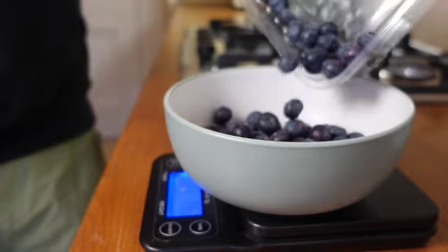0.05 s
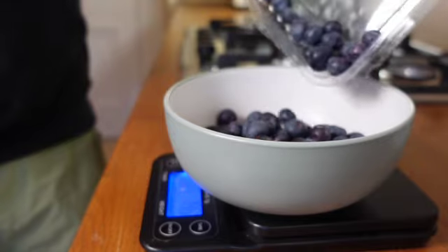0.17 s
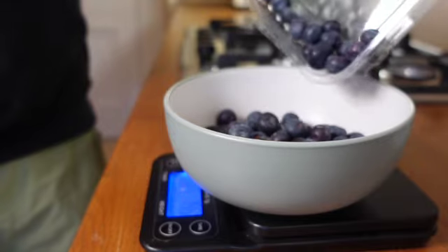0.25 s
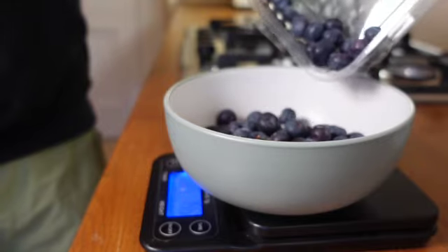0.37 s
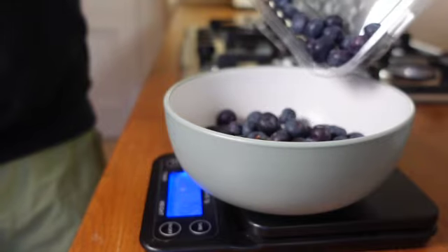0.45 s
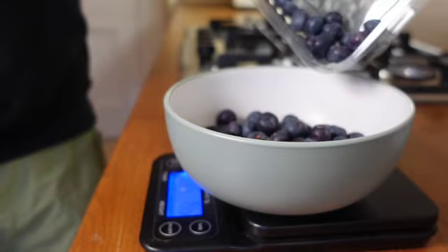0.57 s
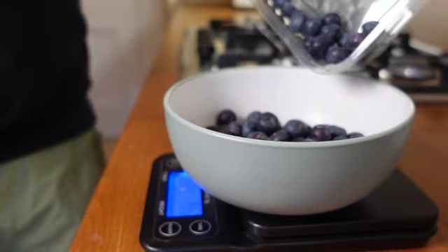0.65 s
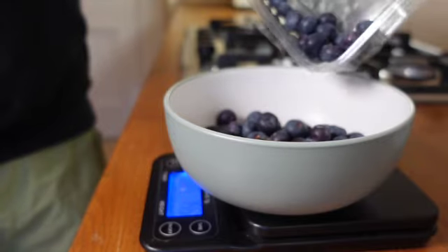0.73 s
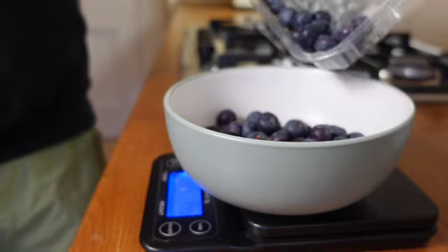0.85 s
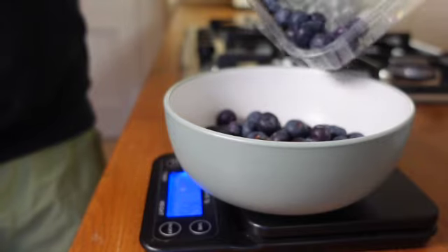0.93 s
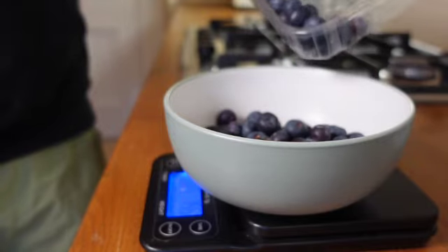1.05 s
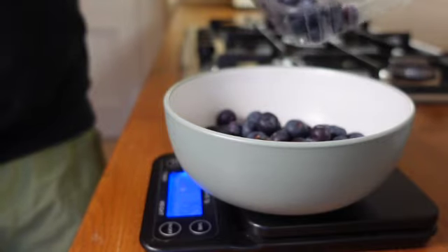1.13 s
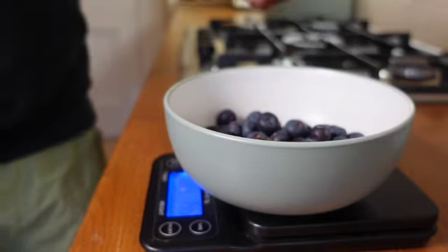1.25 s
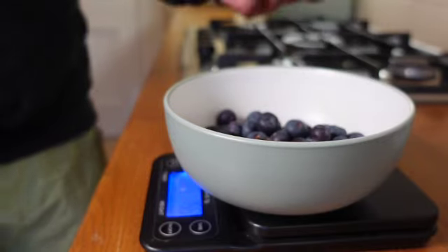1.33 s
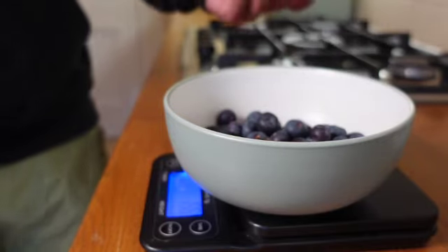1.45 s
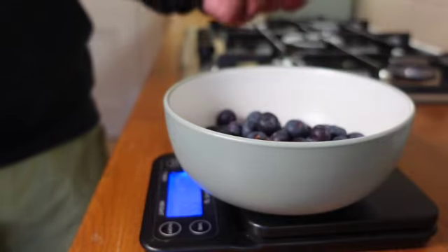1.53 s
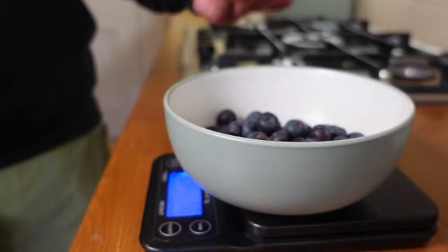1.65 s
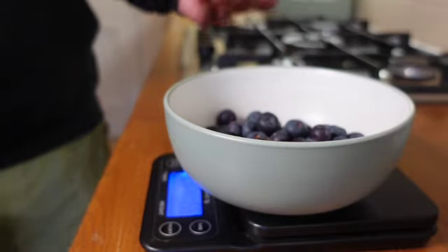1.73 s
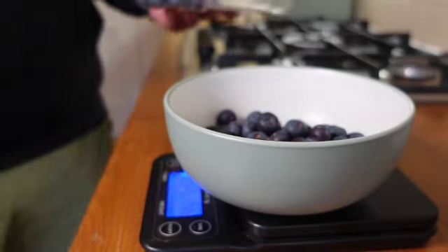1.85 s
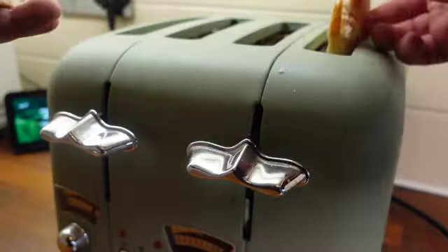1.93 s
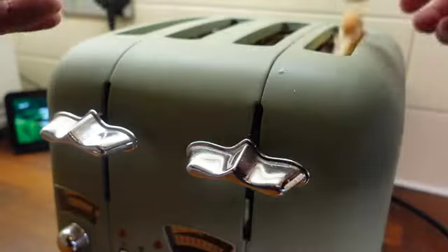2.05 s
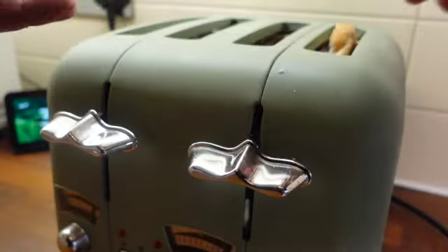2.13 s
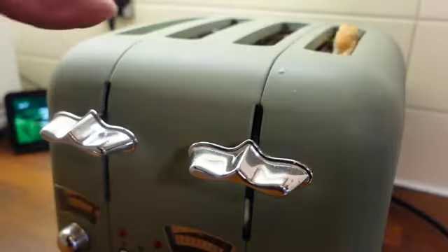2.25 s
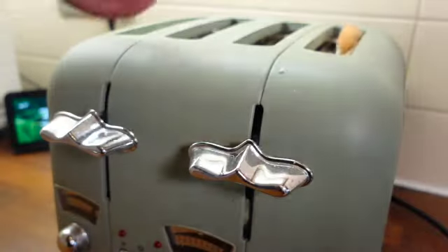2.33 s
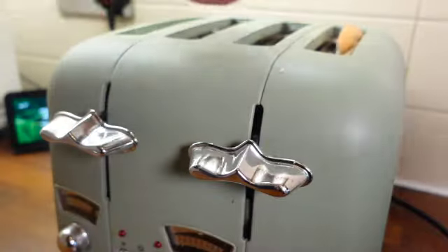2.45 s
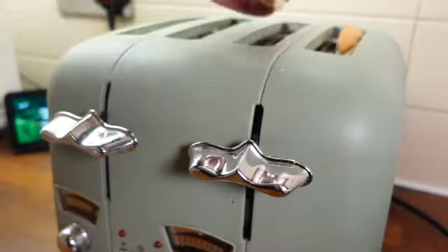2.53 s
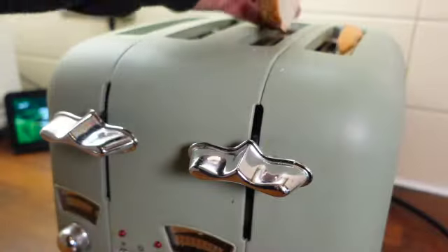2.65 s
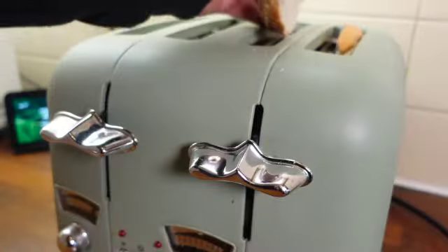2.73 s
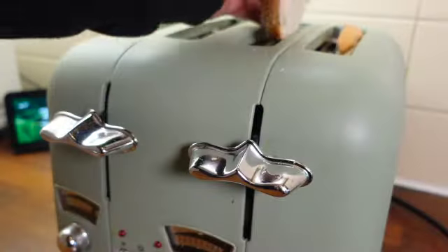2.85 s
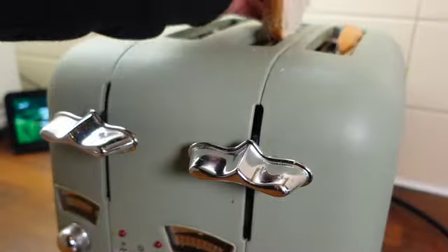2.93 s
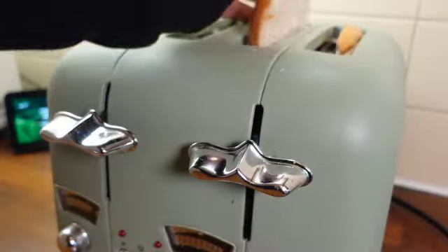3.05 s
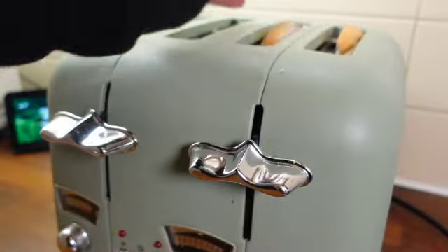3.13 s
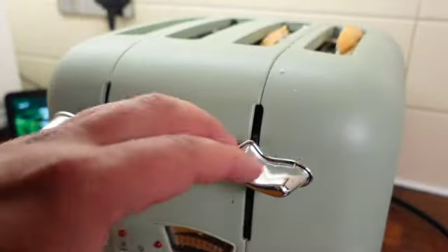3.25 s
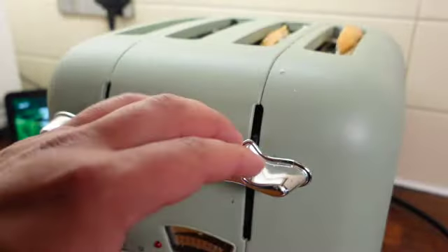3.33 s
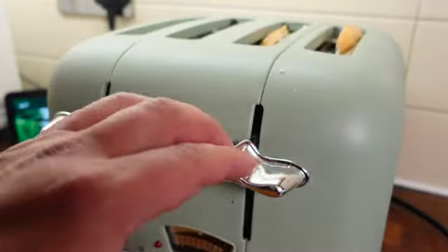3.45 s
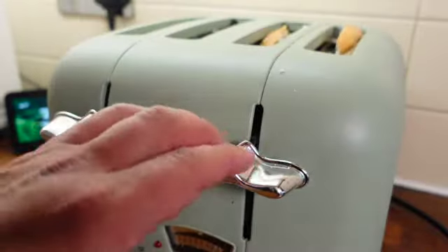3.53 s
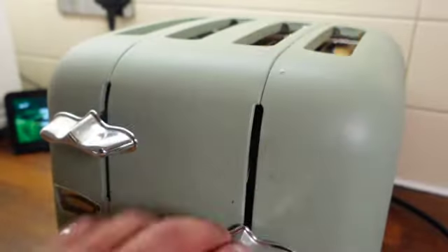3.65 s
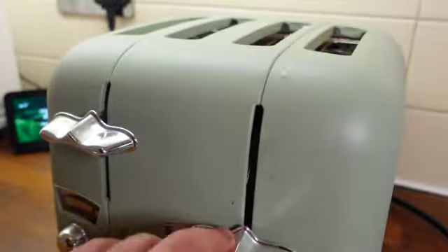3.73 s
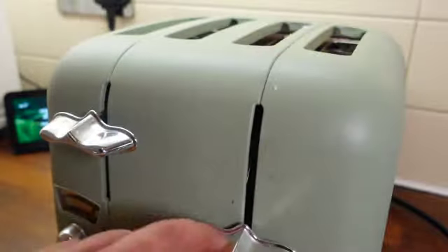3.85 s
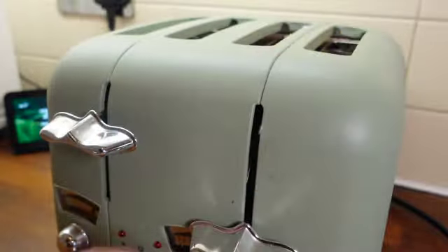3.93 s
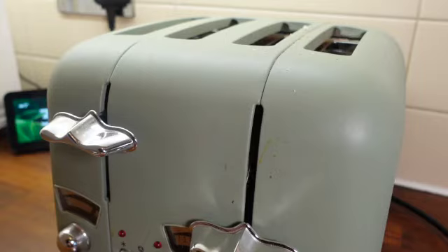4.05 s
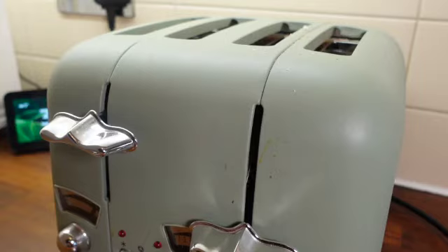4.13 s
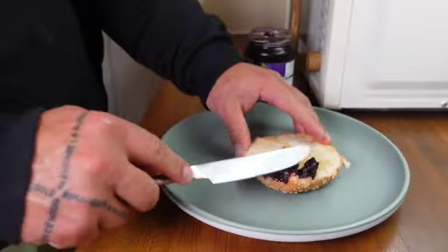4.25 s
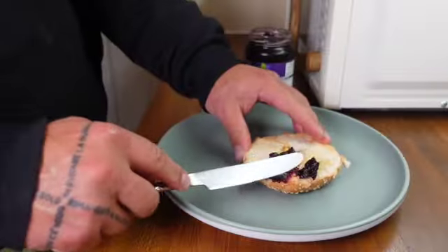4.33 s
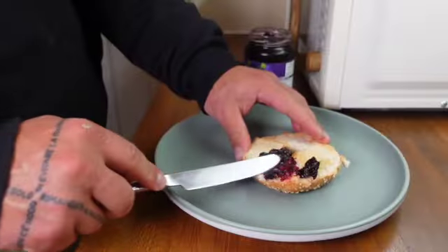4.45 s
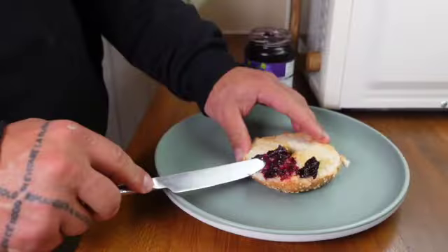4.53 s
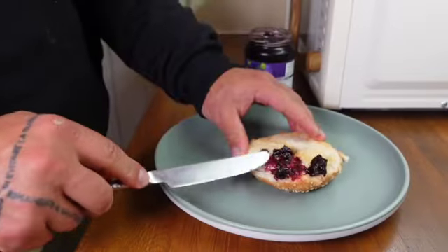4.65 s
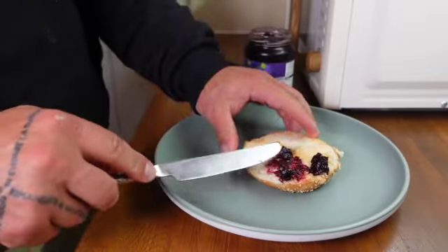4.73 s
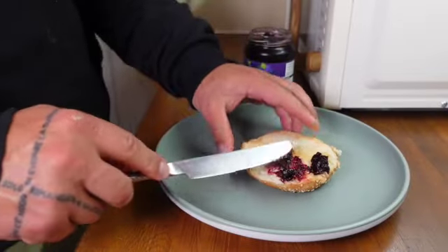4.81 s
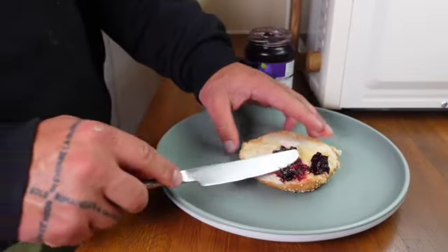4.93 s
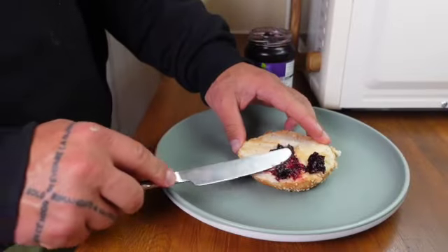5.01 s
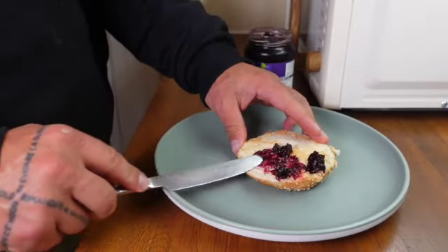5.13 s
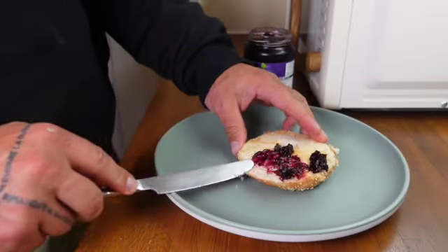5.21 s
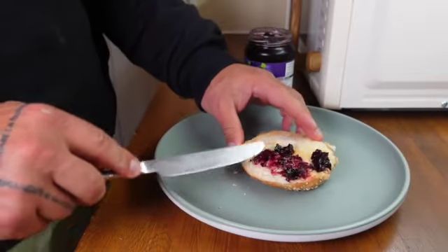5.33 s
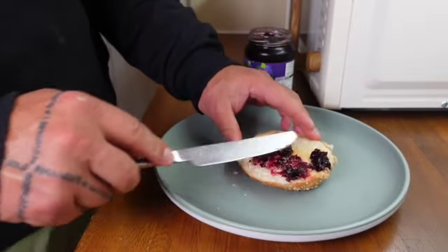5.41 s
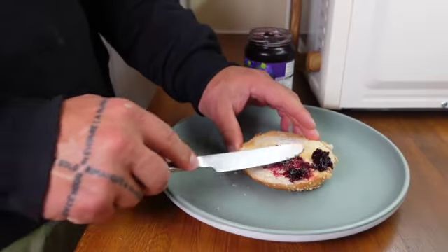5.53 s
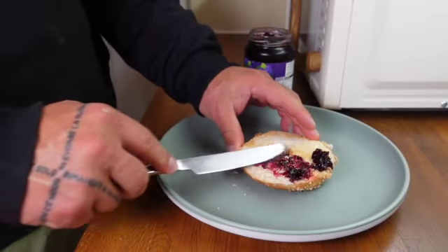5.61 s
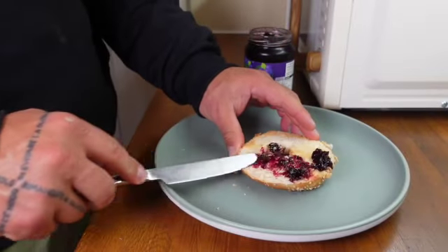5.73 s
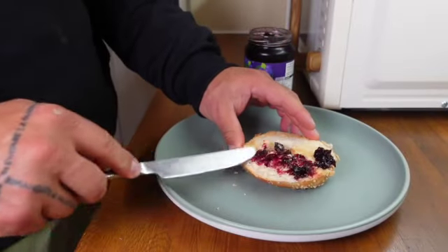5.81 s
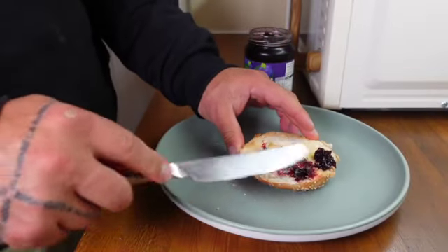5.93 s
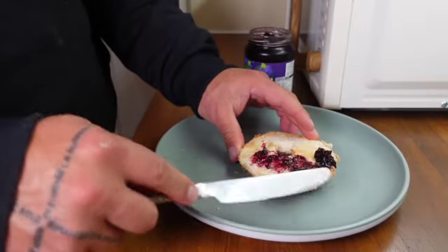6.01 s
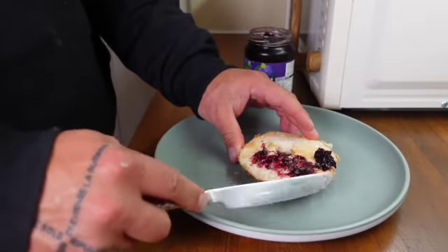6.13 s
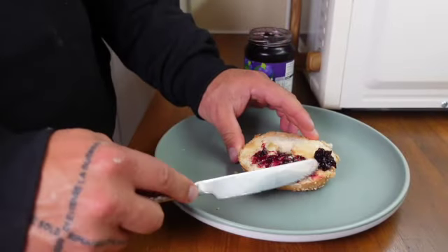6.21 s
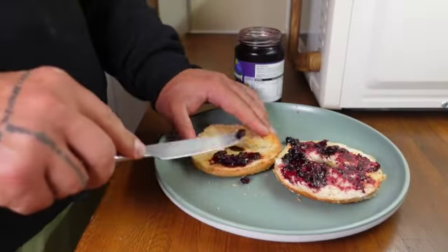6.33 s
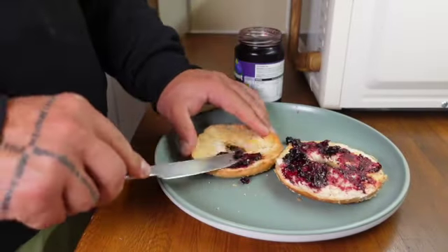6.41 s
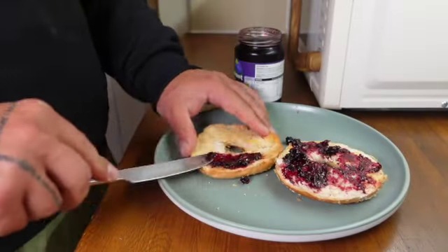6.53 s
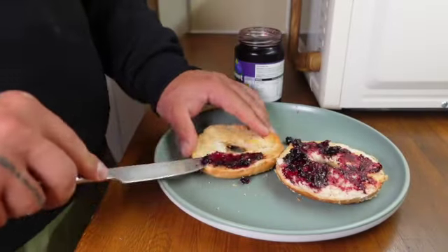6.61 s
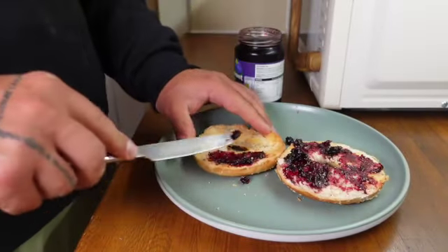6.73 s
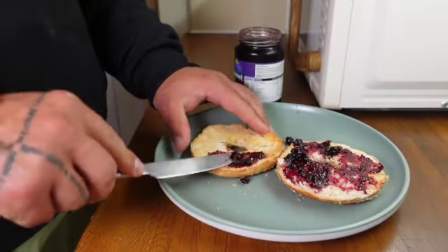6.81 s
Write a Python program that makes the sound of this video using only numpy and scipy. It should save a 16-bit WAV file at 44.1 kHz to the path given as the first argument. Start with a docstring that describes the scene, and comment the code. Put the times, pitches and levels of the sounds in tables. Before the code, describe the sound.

Close stereo recording of breakfast making indoors. It starts very quietly: tiny berry taps, a soft bowl tone, a plastic rustle and dull worktop knocks. Two bursts of dry, metallic scraping come next, the second ending in a loud sprung clatter that stops abruptly. Finally, gentle hissing knife strokes spread jam, mixed with short crunchy scrapes, snapping crumbs and a clear ringing clink of steel on china.

```python
"""Berries, bagel and jam

Three close moments in a small kitchen. Berries slide in a plastic punnet while a china bowl rings out, and
things are set aside. Two bagel halves scrape into a metal toaster and its carriage clatters down. A table
knife spreads jam over the toasted crust and clinks on the plate. Rubbing is noise full of tiny slips, blows
are short coloured cracks, and ringing is made of fading tones or narrow bands of noise."""
import sys
import numpy as np
from scipy import signal
from scipy.io import wavfile
from scipy.ndimage import uniform_filter1d

SR = 44100
rng = np.random.default_rng(int(sys.argv[2]) if len(sys.argv) > 2 else 0)


def master(y):
    """Save y as 16-bit WAV."""
    cut = np.clip(np.atleast_2d(y).T, -1, 1)
    pcm = np.round(cut * 32767)  # scale
    wavfile.write(sys.argv[1], SR, pcm.astype(np.int16))


N = 302815

# Levels of strokes and blows are relative: each layer adds its own level_db.
# Blows: (time [s], level [dB], hardness [dB per octave], pitch of the struck spot [Hz])
# the last berries drop and tick against the punnet
BERRY_TICKS = [(.011, -49, -2.5, 4500), (.038, -51.5, -4.5, 2000), (.059, -48.5, -3, 450),
               (.118, -59, 5, 13000), (.17, -65, 10, 14000)]
# things are set aside on the worktop
KNOCKS = [(1.054, -39.5, 0.5, 164), (1.1967, -51, 3, 2470), (1.4296, -39.5, 1, 1100),
          (1.491, -32.5, 1.5, 1030), (1.499, -33, -1, 337), (1.6168, -42, -2, 1630),
          (1.6488, -35.5, 1, 2260), (1.6567, -38, 0, 1480), (1.702, -31.5, 2.5, 1600),
          (1.7689, -38.5, 0, 1260), (1.816, -44, -1.5, 1580), (1.8622, -41.5, -1, 905)]
# hard crust bumps the toaster slots
SLOT_BUMPS = [(1.943, -33.5, -0.5, 5130), (1.9769, -35.5, 3, 5170), (2.0265, -22.5, -3, 1400),
              (2.035, -26.5, 2.5, 2760), (2.1356, -21.5, 6.5, 3040), (2.144, -15, -1, 3320),
              (2.159, -15, 1, 3290), (2.1945, -17.5, -3.5, 3070), (2.3476, -34.5, 2.5, 3380),
              (3.0061, -35.5, -2, 5810), (3.1347, -34.5, -9.5, 328), (3.169, -22.5, 6.5, 3390),
              (3.1966, -20, -2, 3870), (3.2131, -14.5, -1.5, 3330), (3.2321, -25.5, -6, 3360)]
# the metal carriage clanks; one more column: (..., ring of the shell relative to the level [dB])
CLANKS = [(3.2888, -11.5, -1.5, 3740, -21.5), (3.464, -34.5, -6.5, 3260, -13), (3.5938, -43, -3, 2870, -12),
          (3.6408, -14, 5, 2970, -23), (3.667, -15, 4, 4110, -59), (3.6882, -16.5, 7.5, 5630, -38),
          (3.6985, -10, -5.5, 2990, -21), (3.744, -23, 13.5, 5230, -48), (3.81, -20, -9, 3000, -37)]
# crumbs snap under the blade
CRUST_SNAPS = [(4.4159, -37.5, 1, 7900), (4.5935, -25.5, 2.5, 6500), (5.0514, -40, 7, 9200),
               (5.1274, -47, 10, 4300), (5.465, -42.5, -2, 6860), (5.691, -27, -0.5, 2070),
               (5.756, -31.5, -1, 6000), (6.356, -32, -3, 3500), (6.3864, -49, -8, 3250),
               (6.4083, -33, -2, 2100), (6.4537, -22.5, -2.5, 830), (6.4991, -26.5, 0.5, 3530),
               (6.5604, -28, -1, 2400), (6.76, -37, -3.5, 2440), (6.8404, -37.5, 3, 3250)]

# Strokes: (start [s], rise [s], hold [s], level [dB], relative bass [dB], relative treble [dB])
# soft rustles: a dull berry drop, the hiss of handling, then a slot scrape dying away
SOFT_RUSTLES = [(0, 0.0018, 0.0077, -59, 6, -8), (1.05, 0.025, .01, -62.5, 5, -7),
                (1.29, 0.074, 0.3, -57.5, -5, 8.5), (1.39, 0.1, 0.51, -48.5, -6.5, 1),
                (2.14, 0.028, 0.079, -45, -2, 5.5)]
# berries slide in the punnet
PUNNET_SLIDE = [(.28, 0.16, 0.77, -67, -22, -8.5)]
# a bagel half rasps into its slot
SLOT_SCRAPES = [(1.99, 0.032, 0.0074, -30.5, -35, -6), (2.115, 0.025, 0.025, -22.5, -12.5, -3),
                (2.335, 0.02, .008, -40.5, -17, 8.5), (2.96, 0.051, 0.0069, -38.5, -18, -4),
                (3.02, 0.023, .09, -44.5, -3.5, 1), (3.115, 0.023, 0.082, -29, -1.5, -6.5),
                (3.18, 0.058, 0.011, -22.5, -17, 7)]
# the sprung carriage rattles
CARRIAGE = [(3.285, .005, .005, -52.5, 2.5, -10), (3.595, 0.071, 0.023, -31, -13.5, -10.5),
            (3.68, 0.019, 0.1, -23, -8, 0.5)]
# the blade presses through jam
JAM_SMEARS = [(4.218, 0.0045, 0.29, -46, -24, 3), (4.52, 0.085, .16, -49.5, 1, 4),
              (5.88, 0.089, 0.53, -54, -15.5, -20)]
# the blade rasps on dry crust
CRUST_SCRAPES = [(4.517, 0.021, 0.0075, -33, -23, 4), (4.57, 0.012, 0.014, -41.5, -20, -3),
                 (5.0, 0.011, 0.16, -53, -8.5, 9), (5.12, 0.0058, 0.075, -38, -17.5, 4),
                 (5.19, 0.021, 0.049, -33.5, -18, -5), (5.575, 0.016, 0.16, -42.5, -11.5, 3),
                 (5.74, 0.0067, 0.038, -38.5, -14.5, 5), (6.285, 0.0088, 0.13, -53.5, -10, 0.5),
                 (6.46, 0.033, 0.082, -35, -12.5, 4.5), (6.6, 0.016, .015, -41, -30, 6),
                 (6.73, 0.046, 0.16, -51, -18, -5)]

# brief narrow tones: metal squeaks in the toaster, later the plate ringing under the knife:
# (start [s], length [s], pitch [Hz], level [dB])
BRIEF_TONES = [(3.229, 0.013, 3275, -19.5), (3.615, 0.06, 880, -41), (5.583, 0.13, 1858, -45),
               (5.581, 0.157, 2255, -48), (6.405, 0.043, 2090, -53)]
# the blade meets the plate: (time [s], level [dB], hardness [dB per octave])
CLINKS = [(5.182, -17.5, 3), (5.255, -36.5, 11), (6.408, -51, 7), (6.45, -61, 17)]
# the toaster's clusters of close modes: (pitch [Hz], width [Hz], level [dB], time to fall 60 dB [s])
TOASTER = [(649, 90, -2, 0.35), (818, 80, -1.5, 0.2), (1600, 37, -5.5, 0.3), (3370, 250, -2, 0.12),
           (3700, 170, -7, 0.21), (4130, 130, -17, 0.56), (4160, 210, -5, 0.52)]
# the plate's modes: (pitch [Hz], level [dB], time to fall 60 dB [s])
PLATE = [(1577, -12, 0.4), (1903, -9, .42), (2430, -8, 0.22), (2460, -6.5, 0.19), (2900, -15, 0.26),
         (2968, -5, 0.45), (3230, -12, 0.18), (4070, -7, 0.31), (4190, 1, 0.17), (4870, -11, 0.39),
         (5430, -2.5, 0.22), (6410, -8.5, 0.45), (6800, -12, .24), (6920, -9.5, 0.31), (8380, -4, 0.28),
         (9100, -14, 0.11), (10000, -9, .14), (11080, -17, 0.12), (11850, -19, 0.16), (16000, -23, 0.13)]

# Colours of the strokes, the quiet room and steel on china: (frequency [Hz], relative level [dB per Hz])
RUSTLE_COLOUR = [(29, -27), (55, -29), (120, -6.5), (439, -9.5), (630, -12.5), (905, -11.5), (1330, -11),
                 (7040, -14), (8970, -8.5), (16000, -22)]
PUNNET_COLOUR = [(29, -68), (50, -30), (306, -9), (1700, -21), (2060, -5), (2440, -13), (4040, 7),
                 (5950, -27), (16000, -35)]
STILL_COLOUR = [(18, -54), (55, -29), (120, -6.5), (345, -0.5), (700, -4.5), (1630, -7), (2060, -5.5),
                (2480, -8.5), (5040, -12), (16000, -20)]
SLOT_COLOUR = [(24, -36), (40, -39), (95, -10), (140, -11.5), (290, -10.5), (600, -11.5), (751, -19),
               (1270, -10), (2700, -8), (3300, -12.5), (4930, -12), (16000, -11)]
CARRIAGE_COLOUR = [(21, -56), (35, -28), (76, -3), (431, 1), (503, -13), (650, -3), (758, -8.5),
                   (1510, -1.5), (1720, -5.5), (2060, -0.5), (14800, -16.5), (16000, -25)]
JAM_COLOUR = [(29, -17), (50, -11), (91, 8), (184, 6.5), (345, -7.5), (472, -9), (1360, -14.5), (3670, -6),
              (7040, -6), (8750, 0.5), (16000, -6)]
CRUST_COLOUR = [(35, -66), (60, -25), (389, -11), (715, -5), (1140, 0), (1410, -4.5), (1820, -1),
                (12700, -5), (13900, -3.5), (16000, -10)]
CLINK_COLOUR = [(40, -89), (200, -58), (600, -19), (1350, -27), (1880, -1), (2200, -10), (2500, 2.5),
                (2980, 7.5), (3450, -14), (4100, -5), (4500, -30), (16000, -32)]

# Broad resonances of the things touched: (frequency [Hz], width [Hz], lift [dB])
RUSTLE_PEAKS = [(4980, 270, 4.4), (9300, 900, 2.9), (10300, 370, 4.3)]
PUNNET_PEAKS = [(2060, 310, 17), (4050, 600, 0), (5200, 450, 23)]
TOASTER_PEAKS = [(3350, 120, 4.2), (3970, 230, 6.1), (5620, 190, 4.7)]
CARRIAGE_PEAKS = [(411, 21, 0.37), (600, 78, 1.5)]
JAM_PEAKS = [(3680, 120, 9.8), (4300, 560, 1.9), (9300, 1100, 3.6), (10100, 600, 3.3)]
KNIFE_PEAKS = [(3280, 1400, 3.6), (5960, 210, 4.1), (7760, 740, 2.8)]
WORKTOP_PEAKS = [(168, 30, 4.7), (355, 200, 4.4), (1420, 160, 1), (2290, 150, 3.3)]

# how long the room rings: (frequency [Hz], time to fall 60 dB [s])
ROOM_T60 = [(100, 1), (500, 0.73), (2500, 0.68), (6000, 0.44), (14000, 0.44)]
# how unlike the two channels hear the room: (frequency [Hz], level [dB])
ROOM_SPREAD = [(120, 0.5), (280, 0), (600, 3.5), (1100, 1.5), (2500, -2.5), (8000, -6.5), (13000, -13)]
# thud, body, clang and fizz of a blow lie between these: (edge [Hz])
REGISTER_EDGES_HZ = [80, 500, 2500, 6000, 16000]
# bass, middle and treble of a stroke meet at these: (edge [Hz])
STROKE_EDGES_HZ = [600, 5500]
# the frequencies at which every colour is drawn
GRID_HZ = np.fft.rfftfreq(4096, 1 / SR)

CUTOFF_HZ = 16000
HARDNESS_PIVOT_HZ = 3400  # a harder blow gains above this and loses below
SWELL_DB = 16.5  # a stroke swells by this much while the hand speeds up
RELEASE_S = 0.1
TONE_WIDTH, TONE_GLIDE = 0.11, 0.056  # band width and upward glide, as shares of the pitch
TOASTER_ENDS_S = 4.224  # the toaster is silent from here on


def amp(db):
    """Turns decibels into a gain."""
    return 10 ** (np.asarray(db) / 20)


def unit(x):
    """Scales a sound to an average strength (rms) of one."""
    return x / np.sqrt(np.mean(x ** 2) + 1e-20)


def read(points, hz):
    """Reads a curve of (frequency, value) points, spaced as the ear spaces pitch (log frequency)."""
    f, value = np.transpose(points)
    return np.interp(np.log(hz + 1), np.log(f + 1), value)


def add(mix, s, sound):
    """Mixes a sound in at time s."""
    part = mix[max(round(s * SR), 0):][:len(sound)]
    part += sound[:len(part)]


def lifts(peaks):
    """Adds up broad resonances into one curve in dB."""
    return sum(db / (1 + (2 * (GRID_HZ - hz) / width) ** 2) for hz, width, db in peaks)


def coloured(x, curve_db):
    """Filters without any sound ahead of time (minimum phase), so that attacks stay sharp."""
    log_gain = np.log(amp(np.maximum(curve_db, curve_db.max() - 100)))
    circle = np.concatenate([log_gain, log_gain[-2:0:-1]])
    taps = np.fft.ifft(np.exp(np.conj(signal.hilbert(circle)))).real
    return signal.fftconvolve(x, taps[:len(GRID_HZ)])[:len(x)]


def kitchen(x, wet_db, width=0.25):
    """Adds a dense room tail whose treble dies first; the two channels differ only by the side part."""
    # scatter random echoes, one in each short slot of time
    count = SR // 8
    taps = np.zeros((2, SR))
    at = np.arange(count) * (SR // count) + rng.integers(0, SR // count, (2, count))
    np.put_along_axis(taps, at, rng.choice([-1., 1.], at.shape), 1)
    # let each frequency fade at its own speed, after a short gap and build-up
    hz, t, z = signal.stft(taps, SR, nperseg=256)
    fade = amp(-60 * t / read(ROOM_T60, hz)[:, None])
    build_up = np.clip(t / 0.012 - 0.3, 0, 1)
    tails = signal.istft(z * fade * build_up, SR, nperseg=256)[1]
    tails = tails / np.linalg.norm(tails[0])
    mid, side = amp(wet_db) * signal.fftconvolve(x[None], tails, axes=1)[:, :N]
    side = coloured(side, read(ROOM_SPREAD, GRID_HZ))
    return x + mid + width * np.array([side, -side])


def strokes(rows, colour, peaks, level_db, grains_per_s, grain_db, smooth, judder_db, fall_db, dulling_db, ease):
    """Friction: tiny slips of uneven size over a smooth hiss, clumped by the judder of the hand."""
    size = amp(grain_db * np.minimum(rng.exponential(1, N), 4)) * rng.choice([-1., 1.], N)
    slips = unit(size * (rng.random(N) < grains_per_s / SR))
    hiss = smooth * rng.standard_normal(N)
    judder = unit(uniform_filter1d(rng.standard_normal(N), size=260))
    drive = (slips + hiss) * amp(judder_db * judder)
    rubbed = coloured(drive, read(colour, GRID_HZ) + lifts(peaks))

    low, high = STROKE_EDGES_HZ
    bands = []
    for edge, kind in [(low, "low"), ([low, high], "band"), (high, "high")]:
        band_filter = signal.butter(4, edge, kind, fs=SR, output="sos")
        bands.append(unit(signal.sosfilt(band_filter, rubbed)))

    power, t = np.zeros((3, N)), np.arange(2 * SR) / SR
    for start, rise, hold, db, bass_db, treble_db in rows:
        # RELEASE_S after the hold a stroke is fall_db down (the treble dulling_db more); ease < 1 slows the tail
        release = (np.maximum(t - rise - hold, 0) / RELEASE_S) ** ease
        swell_db = SWELL_DB * np.maximum(1 - t / rise, 0)
        effort_db = level_db + db - swell_db - fall_db * release
        for band_power, tone_db in zip(power, [bass_db, 0, treble_db - dulling_db * release]):
            add(band_power, start, amp(effort_db + tone_db) ** 2)
    return (np.sqrt(power) * bands).sum(0)


def crack(spike_t60, chatter_t60, chatter_db):
    """The contact of a blow: a sharp spike, then a brief chatter of crowded modes (t60: s to fall 60 dB)."""
    t = np.arange(SR // 4) / SR
    spike = amp(-60 * t / spike_t60)
    chatter = amp(chatter_db - 60 * t / chatter_t60)
    return rng.choice([-1., 1.], len(t)) * (spike + chatter)


def blows(rows, peaks, level_db, thud_db, body_db, fizz_db, spot_db, spot_width,
          spike_t60, chatter_t60, chatter_db):
    """Each crack takes the colour of the struck thing, its hardness and the ring of the struck spot."""
    out, edges = np.zeros(N), np.array(REGISTER_EDGES_HZ)
    centres = np.sqrt(edges[1:] * edges[:-1])
    shares = np.diff(edges) / (SR / 2)
    # thud, body and fizz are set against the clang, then spread over the width of each register
    density_db = np.array([thud_db, body_db, 0, fizz_db]) - 10 * np.log10(shares)
    bass_cut_db = 10 * np.log10(1 + (90 / (GRID_HZ + 1)) ** 4)
    thing_db = read(np.c_[centres, density_db], GRID_HZ) + lifts(peaks) - bass_cut_db
    octaves = np.log2(np.clip(GRID_HZ, centres[0], centres[-1]) / HARDNESS_PIVOT_HZ)
    for s, db, hardness, hz, *_ in rows:
        spot = lifts([(hz, spot_width * hz, spot_db)])
        contact = crack(spike_t60, chatter_t60, chatter_db)
        add(out, s, amp(db + level_db) * coloured(contact, thing_db + hardness * octaves + spot))
    return out


def fuzzy_tone(hz, width, count):
    """A narrow band of noise around a steady or gliding pitch, like many modes beating."""
    lead = SR // 8  # lets the filter settle first
    wobble = rng.standard_normal(count + lead) + 1j * rng.standard_normal(count + lead)
    narrow = signal.butter(2, width / 2, fs=SR, output="sos")
    wobble = signal.sosfilt(narrow, wobble)[lead:]
    carrier = np.exp(2j * np.pi * np.cumsum(hz * np.ones(count)) / SR)
    return unit((wobble * carrier).real)


def still_air(level_db=-67):
    """The faint steady noise of the room: coloured noise, with the room tail added."""
    noise = unit(coloured(rng.standard_normal(N), read(STILL_COLOUR, GRID_HZ)))
    return kitchen(amp(level_db) * noise, wet_db=-2, width=0.97)


def bowl(level_db=-56, hz=1194, partner_db=-5, t60=2.6, beat_hz=4.1, hush_s=0.15, damped_s=0.42):
    """The china bowl rings out: two close modes beat, cancelling most at hush_s, until damped at damped_s."""
    t = np.arange(N) / SR
    main = np.sin(2 * np.pi * hz * t)
    partner = amp(partner_db) * np.sin(2 * np.pi * (hz * t + beat_hz * (t - hush_s)))
    damping_db = 300 * np.maximum(t - damped_s, 0)
    return (main - partner) * amp(level_db - 60 * t / t60 - damping_db)


def berries():
    """Berries tick and slide in the punnet as the bowl rings; things are set aside among soft rustles."""
    rustle = strokes(SOFT_RUSTLES, RUSTLE_COLOUR, RUSTLE_PEAKS, level_db=-7.5, grains_per_s=3000, grain_db=-4.0,
                     smooth=4.5, judder_db=1.1, fall_db=6.5, dulling_db=-2.0, ease=0.8)
    ticks = blows(BERRY_TICKS, [], level_db=-12, thud_db=-15, body_db=10.5, fizz_db=4, spot_db=5,
                  spot_width=0.25, spike_t60=0.024, chatter_t60=0.08, chatter_db=-22)
    slide = strokes(PUNNET_SLIDE, PUNNET_COLOUR, PUNNET_PEAKS, level_db=-4.5, grains_per_s=4500, grain_db=19,
                    smooth=0.98, judder_db=-2.5, fall_db=7, dulling_db=-5, ease=1)
    knocks = blows(KNOCKS, WORKTOP_PEAKS, level_db=-7.5, thud_db=-8.5, body_db=3, fizz_db=-7, spot_db=10.5,
                   spot_width=0.11, spike_t60=0.037, chatter_t60=0.39, chatter_db=-14.5)
    return bowl() + kitchen(slide + rustle + knocks + ticks, wet_db=-10.0, width=0.39)


def toaster():
    """Crust rasps down the wire guides, the shell clanks, and the sprung carriage rattles down."""
    bumps = blows(SLOT_BUMPS, TOASTER_PEAKS, level_db=-11.0, thud_db=-27, body_db=-15.5, fizz_db=-1.5, spot_db=14,
                  spot_width=0.073, spike_t60=0.052, chatter_t60=0.25, chatter_db=-6.5)
    slots = strokes(SLOT_SCRAPES, SLOT_COLOUR, TOASTER_PEAKS, level_db=-9.0, grains_per_s=1800, grain_db=2.0,
                    smooth=0.94, judder_db=1.5, fall_db=15, dulling_db=13, ease=0.64)
    carriage = strokes(CARRIAGE, CARRIAGE_COLOUR, CARRIAGE_PEAKS, level_db=-2.5, grains_per_s=3800, grain_db=2.5,
                       smooth=1.0, judder_db=0.05, fall_db=8.5, dulling_db=6.5, ease=0.88)
    clanks = blows(CLANKS, TOASTER_PEAKS, level_db=-10.0, thud_db=-36.5, body_db=-16, fizz_db=-6, spot_db=12,
                   spot_width=0.19, spike_t60=0.052, chatter_t60=0.087, chatter_db=-11)
    rubbing_and_ring = kitchen(slots + carriage + shell_ring(), wet_db=-16.5)
    struck = kitchen(bumps + clanks, wet_db=-28)
    # everything from this function, tail included, fades out within 5 ms
    heard = np.clip((TOASTER_ENDS_S - np.arange(N) / SR) / 0.005, 0, 1)
    return heard * (rubbing_and_ring + struck)


def brief_tones():
    """Metal squeaks in the toaster, later the plate under the knife: narrow noise rising a little in pitch."""
    out = np.zeros(N)
    for start, length, hz, db in BRIEF_TONES:
        count = max(round(length * SR), 64)
        pitch = hz * (1 + TONE_GLIDE * np.linspace(-0.5, 0.5, count))
        tone = fuzzy_tone(pitch, TONE_WIDTH * hz, count)
        add(out, start, amp(db) * tone * signal.windows.tukey(count, 0.4))
    return kitchen(out, wet_db=-23)


def shell_ring():
    """The toaster's thin metal rings roughly; each clank tops up the energy of its modes."""
    out, first = np.zeros(N), CLANKS[0][0]
    t = first + np.arange(SR) / SR
    for hz, width, db, t60 in TOASTER:
        power = np.zeros(len(t))
        for s, level_db, _, _, ring_db in CLANKS:
            fading_db = level_db + ring_db + db - 60 * abs(t - s) / t60
            power += (t >= s) * amp(fading_db) ** 2
        add(out, first, np.sqrt(power) * fuzzy_tone(hz, width, len(t)))
    return out


def knife():
    """The blade hisses through jam, rasps on dry crust and snaps crumbs off it."""
    jam = strokes(JAM_SMEARS, JAM_COLOUR, JAM_PEAKS, level_db=-9.0, grains_per_s=770, grain_db=-3.0,
                  smooth=1.8, judder_db=1.2, fall_db=5.5, dulling_db=-0.5, ease=0.56)
    snaps = blows(CRUST_SNAPS, KNIFE_PEAKS, level_db=-8.5, thud_db=-30, body_db=-15, fizz_db=-3.5, spot_db=7.5,
                  spot_width=0.14, spike_t60=0.023, chatter_t60=0.14, chatter_db=-8.5)
    crust = strokes(CRUST_SCRAPES, CRUST_COLOUR, KNIFE_PEAKS, level_db=-4.0, grains_per_s=1500, grain_db=-4.0,
                    smooth=0.69, judder_db=2.6, fall_db=20.5, dulling_db=3.5, ease=0.7)
    return kitchen(jam + crust + snaps, wet_db=-11.0, width=0.27)


def clinks(crack_db=7, ring_db=-8.5, split=0.006, partner_db=-6):
    """Steel on china: a crack, then the clear modes of the plate; a harder touch favours the high ones."""
    out, t = np.zeros(N), np.arange(SR * 3 // 4) / SR
    colour_db = read(CLINK_COLOUR, GRID_HZ)
    colour_db = colour_db - 10 * np.log10(np.mean(amp(colour_db) ** 2))  # average power of one
    for s, level_db, hardness in CLINKS:
        contact = crack(spike_t60=0.025, chatter_t60=0.16, chatter_db=-14)
        add(out, s, amp(level_db + crack_db) * coloured(contact, colour_db))
        for k, (hz, db, t60) in enumerate(PLATE):
            tilt_db = hardness * np.log2(hz / 3000)
            mode_db = level_db + ring_db + db + tilt_db - 60 * t / t60
            # the plate is not quite round, so each mode has a close partner
            main = np.sin(2 * np.pi * hz * t)
            partner = amp(partner_db) * np.sin(2 * np.pi * hz * (1 - split) * t)
            # neighbouring modes swing opposite ways
            add(out, s, (-1) ** k * amp(mode_db) * (main + partner))
    return kitchen(out, wet_db=-11, width=0.51)


def scene():
    """All the sources in the one kitchen."""
    return still_air() + berries() + toaster() + brief_tones() + knife() + clinks()


def record(dry):
    """The microphone's bass roll-off, then a cut of everything above the top limit."""
    roll_off = signal.butter(2, 50, "high", fs=SR, output="sos")
    thinned = signal.sosfilt(roll_off, dry)
    band_limit = signal.firwin(401, CUTOFF_HZ, window=("kaiser", 8), fs=SR)
    return signal.oaconvolve(thinned, band_limit[None], "same")


dry = scene()
out = record(dry)
master(out)
```